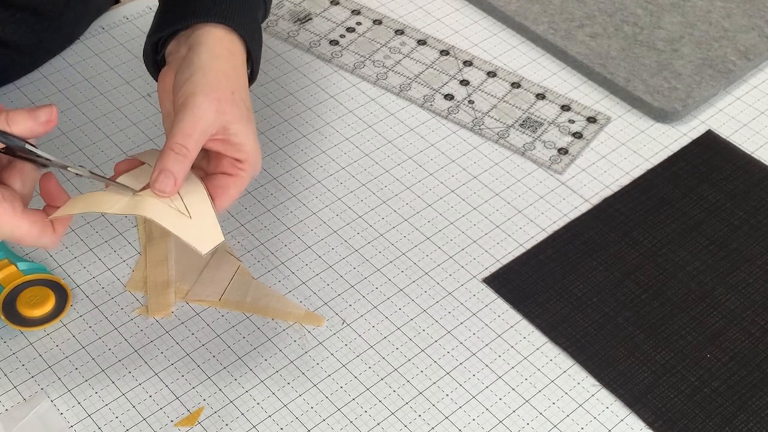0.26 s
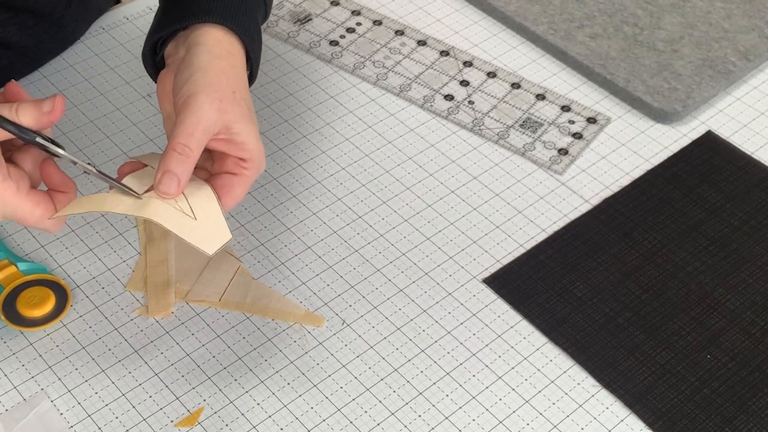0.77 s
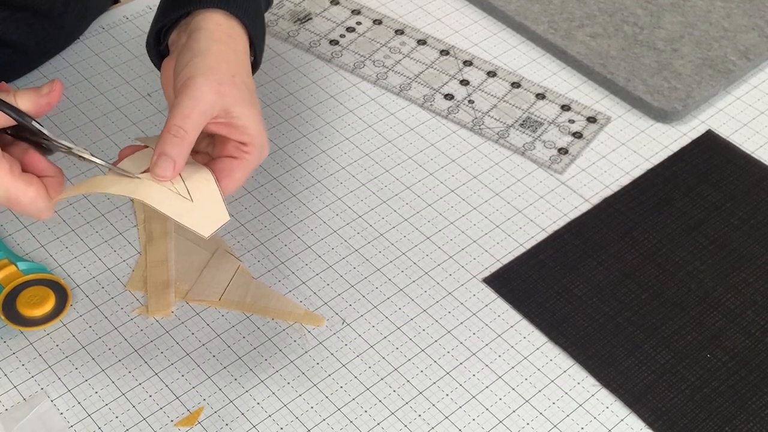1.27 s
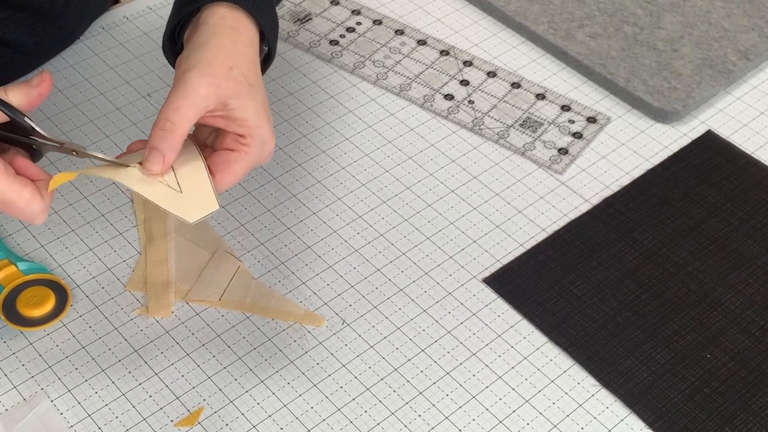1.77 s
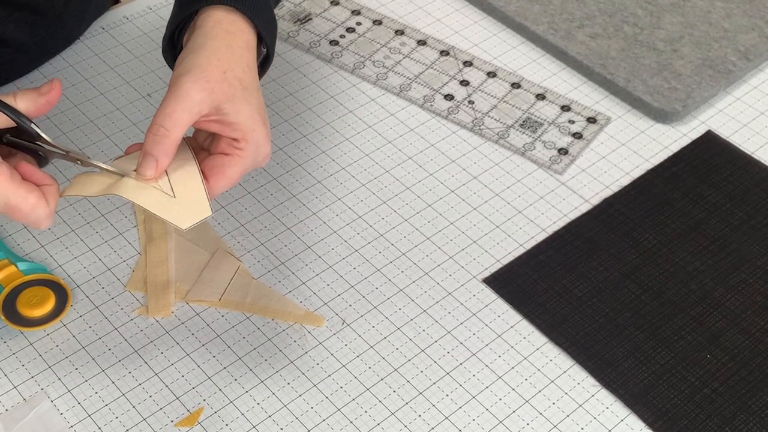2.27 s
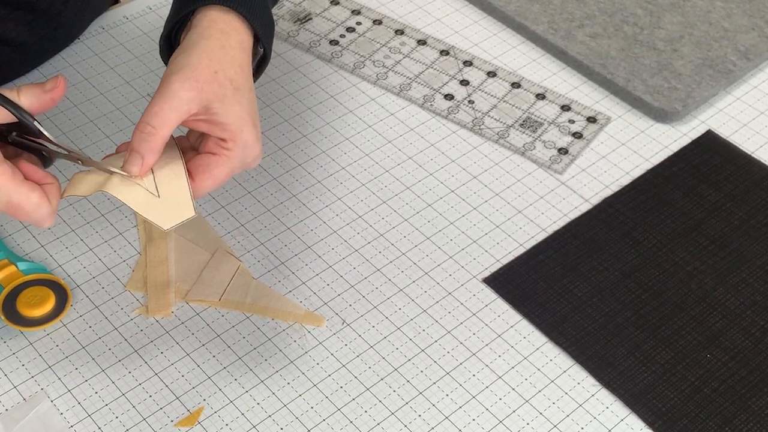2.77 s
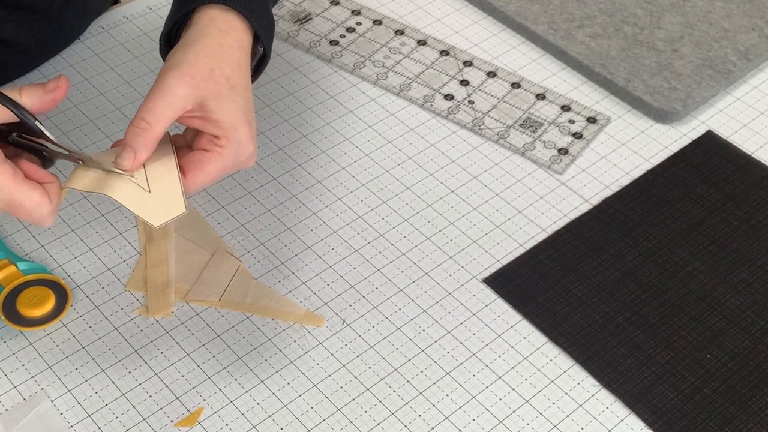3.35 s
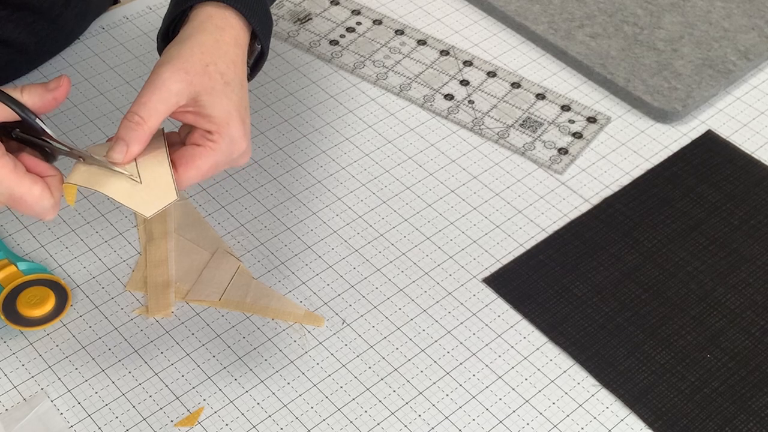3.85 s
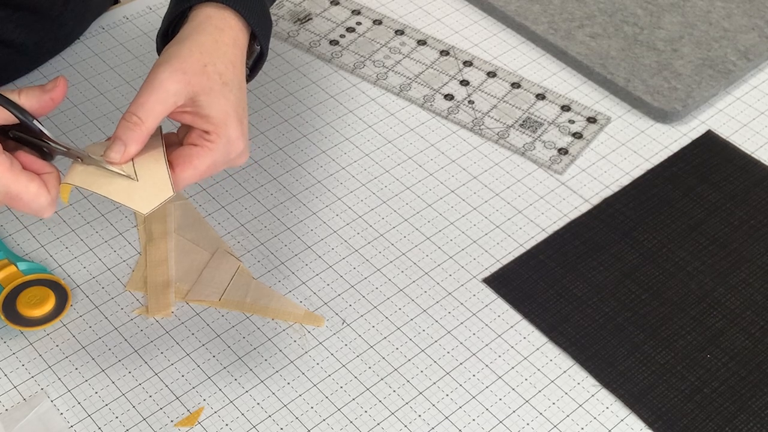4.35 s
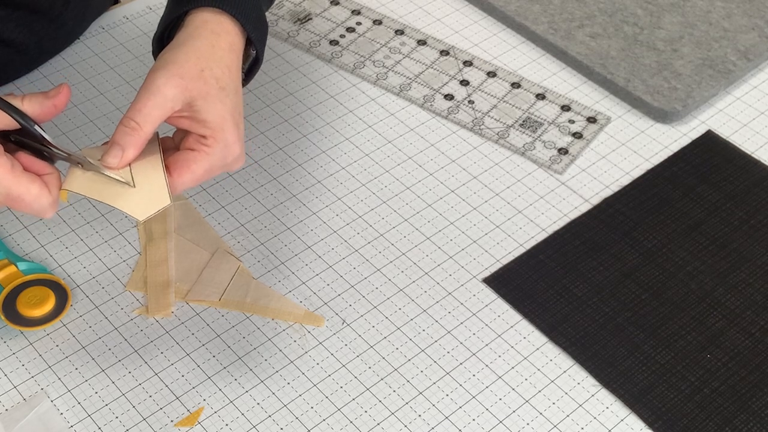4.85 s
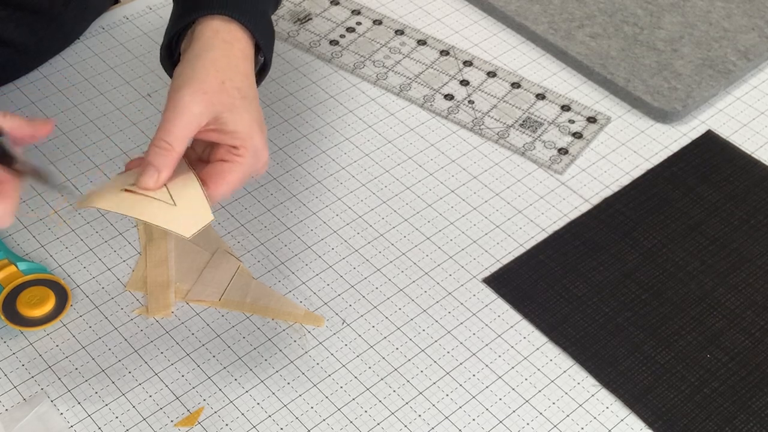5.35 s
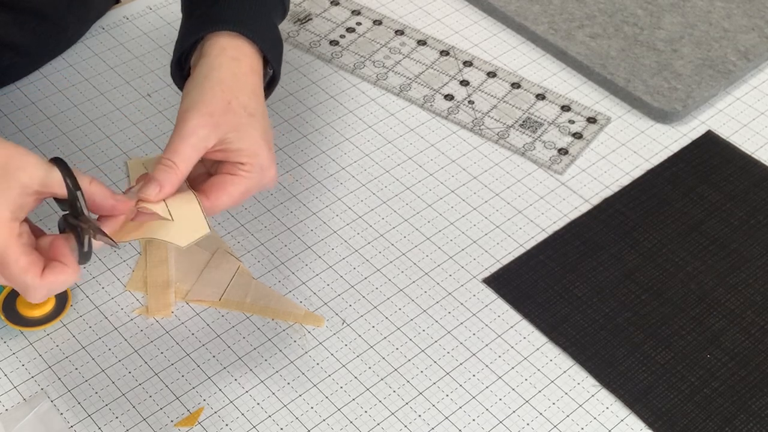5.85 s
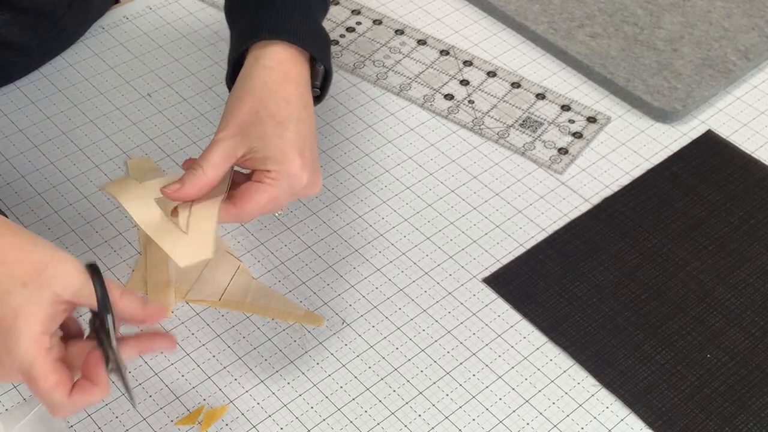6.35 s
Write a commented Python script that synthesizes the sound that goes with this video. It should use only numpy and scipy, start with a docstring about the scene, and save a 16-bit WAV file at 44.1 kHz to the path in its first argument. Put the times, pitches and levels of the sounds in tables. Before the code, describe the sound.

In a small dry room, small sharp scissors close with a brief knock, then work through stiff backed fabric in short separate rasps, light at first, firmer and crackling later. Blades slide along the cloth between cuts. The last cut bursts into crisp snaps and a second clack, then faint rustling. A low rumble, soft even hiss and wavering distant machine hum continue. Close microphone, scissors centred.

```python
"""Craft table in a small dry room: small sharp scissors work through backed fabric.
Random fibre breaks, filtered by cloth, blades and backing, rasp in short strokes; thread bundles snap
as brief crackle, and twice the scissors clack shut, a knock with ringing handles and blades.
Shaped noise makes a low rumble and a soft even hiss; wavering sines make the hum of distant machines."""
import sys
import numpy as np
from scipy import signal
from scipy.fft import rfft, irfft, next_fast_len
from scipy.io import wavfile
from scipy.ndimage import uniform_filter1d, map_coordinates

SR = 44100
rng = np.random.default_rng(int(sys.argv[2]) if len(sys.argv) > 2 else 0)


def generate_wav(sig):
    """Save sig (samples, or channels by samples) to the path in sys.argv[1] as 16-bit PCM at SR."""
    pcm = np.round(np.clip(np.atleast_2d(sig).T, -1, 1) * 32767).astype(np.int16)
    wavfile.write(sys.argv[1], SR, pcm)


N = 292199

# Spectrum of the stiff cloth. Each row: frequency in Hz, relative density in dB per Hz.
CLOTH_SPECTRUM = [(250, -9), (600, -13), (870, 0), (1150, -3.5), (1800, 0.5), (2300, -1), (2900, 1),
                  (3600, 1), (4400, 0), (5600, -2.5), (6300, -6), (9000, -8.5), (12500, -12.5),
                  (15500, -33)]
# Resonances of the blades. Each row: frequency in Hz, width in Hz, relative level in dB.
BLADE_MODES = [(4380, 200, 1), (5640, 230, 0.5), (6960, 510, 1), (8100, 460, 5.5), (9130, 810, -3),
               (10230, 660, -4), (11730, 440, -8), (12700, 390, -5.5)]


def amp(db):
    """Decibels to gain."""
    return 10 ** (np.asarray(db) / 20)


def unit(x):
    """Scale to rms 1."""
    return x / np.sqrt(np.mean(x ** 2) + 1e-20)


def along(points, hz):
    """Read (Hz, value) points on a log frequency axis."""
    f, v = np.transpose(points)
    return np.interp(np.log(hz + 1), np.log(f + 1), v)


def wobble(rate_hz):
    """Smooth random curve with rate_hz knots a second."""
    knots = rng.standard_normal(int(N * rate_hz / SR) + 4)
    return map_coordinates(knots, [np.arange(N) * rate_hz / SR])


def filtered(x, response):
    """Multiply the spectrum of x by a response of frequency."""
    m = next_fast_len(N + SR // 2)
    return irfft(rfft(x, m) * response(np.fft.rfftfreq(m, 1 / SR)), m)[..., :N]


def body(x, spectrum, size=2048):
    """Minimum-phase filter with this spectrum and unit pulse energy."""
    log_gain = np.log(amp(along(spectrum, np.fft.rfftfreq(size, 1 / SR))))
    cepstrum = irfft(log_gain)
    cepstrum[1:size // 2] *= 2  # fold onto positive time: causal
    cepstrum[size // 2 + 1:] = 0
    pulse = irfft(np.exp(rfft(cepstrum)))
    return signal.fftconvolve(x, pulse / np.linalg.norm(pulse))[:N]


def ring(x, modes, size=1024, soft_hz=13300):
    """Resonances damped by fingers and cloth; the soft contact dulls the very top."""
    t = np.arange(size) / SR
    pulse = np.zeros(size)
    for k, (hz, width_hz, db) in enumerate(modes):
        decay = width_hz * np.exp(-np.pi * width_hz * t)
        pulse += (-1) ** k * amp(db) * decay * np.cos(2 * np.pi * hz * t)
    pulse = signal.sosfilt(signal.butter(5, soft_hz, fs=SR, output="sos"), pulse)
    return signal.fftconvolve(x, pulse / np.linalg.norm(pulse))[:N]


def flexing(x, depth_db, size=256):
    """The cloth bends as it moves, so its spectrum shifts from moment to moment."""
    z = signal.stft(x, nperseg=size)[2]
    field = uniform_filter1d(rng.standard_normal(z.shape), size=3, axis=0)  # bins
    field = uniform_filter1d(field, size=14, axis=1)  # frames
    return signal.istft(z * unit(amp(depth_db * unit(field))), nperseg=size)[1][:N]


def fibres(rate_hz, scatter_db, smooth):
    """Fibres break at random moments and sizes, over a share of smooth friction; rms 1."""
    hits = rng.random(N) < rate_hz / SR
    breaks = hits * rng.choice([-1, 1], N) * amp(scatter_db * rng.standard_normal(N))
    return unit(unit(breaks) + smooth * rng.standard_normal(N))


def rasp(cloth, steel, scrape, catch_db, smooth, catch_rate_hz=130):
    """Fibres catch and break under three envelopes, sounding cloth, blades and backing."""
    # Backing along the flat of a blade. Each row: frequency in Hz, width in Hz, relative level in dB.
    backing_modes = [(886, 110, 3), (2800, 550, -2.5), (4930, 180, 4), (5520, 190, 3)]
    catches = unit(amp(catch_db * wobble(catch_rate_hz)))

    def weave():
        return catches * fibres(rate_hz=2000, scatter_db=0.5, smooth=smooth)

    cloth_sound = flexing(body(cloth * weave(), CLOTH_SPECTRUM), depth_db=2)
    steel_sound = ring(steel * weave(), BLADE_MODES)
    return cloth_sound + steel_sound + ring(scrape * weave(), backing_modes)


def squeeze(start_s, hardest_s, end_s):
    """Cut envelope: pressure builds to the middle of the sorted times, then lets go."""
    return np.interp(np.arange(N) / SR, np.sort([start_s, hardest_s, end_s]), [0, 1, 0])


def cuts(scrape_db=-8):
    """The closing edges squeeze through the cloth and catch unevenly on its threads."""
    # Blades squeezing through the cloth. Each row: start, hardest squeeze and end in seconds
    # (the last two may swap), level in dB, blade level relative to it in dB.
    cut_rows = [(0.82, 0.875, 0.92, -58.5, -7), (1.278, 1.318, 1.31, -58, 0.5),
                (1.986, 2.025, 2.04, -59, 5.5), (2.62, 2.631, 2.806, -51.5, -1.5),
                (3.201, 3.267, 3.392, -51.5, 1), (3.61, 3.735, 3.79, -56, -2),
                (4.548, 4.744, 4.7, -60.5, 4)]
    cloth, steel = np.zeros((2, N))
    for start_s, hardest_s, end_s, db, steel_db in cut_rows:
        pressure = amp(db) * squeeze(start_s, hardest_s, end_s)
        cloth += pressure
        steel += amp(steel_db) * pressure
    return rasp(cloth, steel, amp(scrape_db) * cloth, catch_db=2.5, smooth=0.36)


def burst(s, length_s, rise_s):
    """Short contact envelope: exponential rise against a Gaussian release."""
    age = np.arange(SR // 16) / SR
    shape = (1 - np.exp(-age / rise_s)) * np.exp(-(age / length_s) ** 2)
    return np.pad(shape, (round(s * SR), N))[:N]


def snaps(cloth_db=6, steel_db=-4, fizz_db=-11.0):
    """A thread bundle parts in milliseconds of crackle that fizzes and shakes cloth and blades."""
    # Thickest bundles parting. Each row: start in seconds, drive level in dB before the envelope,
    # cloth drive relative to it in dB before cloth_db, length in seconds.
    snap_rows = [(0.826, -37.5, -10, 0.0069), (0.87, -42, -6, 0.011), (2.007, -33.5, -19, 0.0034),
                 (2.029, -36, -19, 0.0054), (2.075, -33.5, -22, 0.0075), (2.213, -53, 4, .008),
                 (2.634, -36, -5.5, 0.0063), (2.646, -38, -11, .005), (2.71, -36, -16, .006),
                 (3.303, -36, -16, 0.0065), (3.692, -42, -4.5, 0.0076), (3.718, -41.5, -5, 0.0096),
                 (3.744, -35, -10.5, 0.0071), (3.778, -38.5, -13, 0.0078), (3.822, -33.5, -12, .006),
                 (3.843, -41, -15, 0.0087), (4.451, -31.5, -13.5, .011), (4.48, -38.5, -11, 0.0086),
                 (4.596, -37, -18, 0.0087), (4.63, -32, -14, 0.0057), (4.684, -33, -17, 0.011),
                 (4.7266, -30, -16, 0.0055), (4.748, -27, -9.5, 0.0065)]
    # Fizz of the parting threads. Each row: frequency in Hz, relative density in dB per Hz.
    fizz_spectrum = [(2000, -16), (6500, -12), (9000, 4.5), (12500, -3.5), (15500, -11)]
    cloth, threads = np.zeros((2, N))
    for s, db, share_db, length_s in snap_rows:
        tear = amp(db) * burst(s, length_s, rise_s=length_s)
        cloth += amp(share_db + cloth_db) * tear
        threads += tear

    def crackle():
        return fibres(rate_hz=4000, scatter_db=3.5, smooth=0.75)

    cloth_sound = body(crackle() * cloth, CLOTH_SPECTRUM)
    steel_sound = amp(steel_db) * ring(crackle() * threads, BLADE_MODES)
    return cloth_sound + steel_sound + amp(fizz_db) * body(crackle() * threads, fizz_spectrum)


def crack(s, length_s, size=2048):
    """Hard contact: brief chatter with nearly equal energy at every frequency."""
    shape = burst(0, length_s, rise_s=0.00022)[:size]
    phase = np.angle(rfft(shape * rng.standard_normal(size)))
    even = irfft(np.exp(1j * phase)) * np.sqrt(shape)
    even *= np.linalg.norm(shape) / np.linalg.norm(even)
    return np.pad(even, (round(s * SR), N))[:N]


def clacks():
    """The scissors close fully: the handles meet, ring briefly and jar the blades."""
    # Full closings. Each row: start in seconds, drive levels of knock, handles and blades in dB,
    # length in seconds.
    clack_rows = [(0.322, -36, -45, -52, 0.0069), (4.7550, -35, -39, -45, 0.0043)]
    # Knock of the handles meeting. Each row: frequency in Hz, relative density in dB per Hz.
    knock_spectrum = [(150, -12), (350, 2), (560, -1.5), (1000, 4), (1500, 7), (2300, 1), (3400, 5),
                      (4500, 3), (5400, 0.5), (6300, -5), (8000, -5.5), (11000, -15), (15500, -31)]
    # Handle resonances. Each row: frequency in Hz, width in Hz, relative level in dB.
    handle_modes = [(523, 37, 2.5), (835, 350, -3), (1493, 115, 5), (2540, 110, -5), (3700, 290, -3.5),
                    (5630, 350, -9.5)]
    knock, handles, steel = np.zeros((3, N))
    for s, knock_db, handle_db, steel_db, length_s in clack_rows:
        knock += amp(knock_db) * crack(s, length_s)
        handles += amp(handle_db) * crack(s, length_s)
        steel += amp(steel_db) * crack(s, length_s)
    return body(knock, knock_spectrum) + ring(handles, handle_modes) + ring(steel, BLADE_MODES)


def glide(start_s, end_s, edge_s=0.027):
    """Sliding contact envelope: power rises, holds and falls linearly."""
    t = np.arange(N) / SR
    return np.sqrt(np.clip(np.minimum(t - start_s, end_s - t) / edge_s, 0, 1))


def slides(steel_db=-5):
    """The open blades slide along the cloth, its backing scraping evenly on the flat of a blade."""
    # Slides. Each row: start and end in seconds, level in dB, scrape relative to it in dB.
    slide_rows = [(1.452, 1.486, -59.5, -1), (2.064, 2.09, -61.5, 11), (2.227, 2.33, -56, 0),
                  (2.355, 2.457, -61, 1), (2.889, 2.998, -54.5, -11), (3.02, 3.137, -56.5, -6),
                  (3.429, 3.534, -56.5, -1), (4.208, 4.261, -49.5, -3.5), (4.739, 4.768, -51, 7),
                  (4.848, 5, -60, -13)]
    cloth, scrape = np.zeros((2, N))
    for start_s, end_s, db, scrape_db in slide_rows:
        contact = amp(db) * glide(start_s, end_s)
        cloth += contact
        scrape += amp(scrape_db) * contact
    return rasp(cloth, amp(steel_db) * cloth, scrape, catch_db=1.6, smooth=0.47)


def rubs(steel_db=-8.5):
    """The cloth shifts in the fingers with a faint rustle and brushes the blades."""
    # Rubs. Each row: start and end in seconds, level in dB.
    rub_rows = [(1.56, 1.706, -67.5), (1.705, 1.789, -57), (2.45, 2.584, -64.5), (5.223, 5.345, -60.5),
                (5.568, 5.62, -60.5), (5.858, 5.99, -62), (6.283, 6.5, -63)]
    cloth = sum(amp(db) * glide(start_s, end_s) for start_s, end_s, db in rub_rows)
    return rasp(cloth, amp(steel_db) * cloth, 0, catch_db=2.5, smooth=0.72)


def room(x, wet_db, delay_s=0.0034, width_db=-12, count=4):
    """Direct sound plus a short tail; successive instants scatter along different paths."""
    # Decay of the room. Each row: frequency in Hz, t60 in seconds.
    decay_times = [(300, 0.32), (1500, 0.18), (5000, 0.16), (12000, 0.18)]
    hz, t, z = signal.stft(rng.standard_normal((count, 2, SR // 4)), SR, nperseg=256)
    decay = amp(-60 * t / along(decay_times, hz)[:, None])
    mid, side = signal.istft(z * decay, SR, nperseg=256)[1].swapaxes(0, 1)
    build_up = np.clip(np.arange(mid.shape[1]) / SR / delay_s - 1, 0, 1)
    side = amp(width_db) * side
    tails = np.array([mid + side, mid - side]) * build_up
    tails /= np.linalg.norm(tails, axis=2, keepdims=True)
    # overlapping half-cosine windows deal x out to the paths in turn
    turn = np.arange(N) / SR / (2 * delay_s) + np.arange(count)[:, None] / count
    paths = x * np.maximum(np.cos(2 * np.pi * turn), 0)
    return x + amp(wet_db) * signal.oaconvolve(paths[None], tails, axes=2).sum(1)[:, :N]


def hum(waver_db=2.6, waver_rate_hz=3.03, drift_hz=0.677, drift_rate_hz=4):
    """Far machines hum unsteadily; one motor speeds up, its lines rising together and trading strength."""
    # Motor lines. Each row: multiple of the cycle rate, mean level in dB when slow, in dB when fast.
    motor_lines = [(5, -48, -55), (6, -53, -48), (10, -60, -77), (12, -67, -64), (20, -70, -66.5)]
    # Lines of other machines. Each row: mean frequency in Hz, mean level in dB.
    steady_lines = [(193.5, -66)]
    slow_hz, fast_hz = 8.5, 10.05  # cycle rate before and after
    change_s, ramp_s = 4.2, 0.303  # middle and time scale of the change
    speed = (1 + np.tanh((np.arange(N) / SR - change_s) / (2 * ramp_s))) / 2
    cycle_hz = slow_hz + (fast_hz - slow_hz) * speed
    lines = [(round(order) * cycle_hz, slow_db + (fast_db - slow_db) * speed)
             for order, slow_db, fast_db in motor_lines]
    out = np.zeros(N)
    for hz, db in [*lines, *steady_lines]:
        phase = 2 * np.pi * np.cumsum(hz + drift_hz * wobble(drift_rate_hz)) / SR
        out += amp(db + waver_db * wobble(waver_rate_hz)) * unit(np.sin(phase))
    return out


def background(hiss_db=-55, rumble_db=-44.0, swell_db=0.4, swell_rate_hz=2.37):
    """Noise: gently swelling rumble alike in both ears, and hiss that widens towards the treble."""
    # Noise spectra. Each row: frequency in Hz, relative level in dB.
    rumble_spectrum = [(10, 1), (20, 1.5), (33, 1.5), (54, -10.5), (75, -8), (100, -11), (150, -14.5),
                       (200, -17.5), (245, -23.5), (300, -29.5), (400, -28.5), (900, -59)]
    hiss_spectrum = [(150, -17), (250, -3), (392, -9), (451, -7.5), (545, -8), (594, -9), (683, -9.5),
                     (949, -8), (1300, -13), (1740, -14), (2260, -15.5), (2730, -16.5), (4210, -17),
                     (13900, -18.5), (15700, -20.5)]
    # Left-right likeness of the hiss. Each row: frequency in Hz, correlation from 0 to 1.
    likeness = [(60, 1.0), (130, 0.98), (290, 0.96), (640, 0.93), (1410, 0.89), (3100, 0.82), (6820, 0.54),
                (15000, 0.43)]

    def mid_side_gain(hz):
        angle = np.arccos(np.clip(along(likeness, hz), -1, 1)) / 2
        return amp(along(hiss_spectrum, hz)) * np.array([np.cos(angle), np.sin(angle)])

    mid, side = filtered(rng.standard_normal((2, N)), mid_side_gain)
    hiss = unit(np.array([mid + side, mid - side]))
    rumble = filtered(rng.standard_normal(N), lambda hz: amp(along(rumble_spectrum, hz)))
    swelling = unit(rumble * amp(swell_db * wobble(swell_rate_hz)))
    return amp(hiss_db) * hiss + amp(rumble_db) * swelling


def scene():
    """Scissors in the middle, over the background of the room."""
    cutting = room(cuts() + slides() + rubs() + snaps(), wet_db=-11.5)
    closing = room(clacks(), wet_db=-3.0)
    return cutting + closing + hum() + background()


def record(dry, top_hz=15830):
    """Band limit: nothing passes from top_hz up."""
    return filtered(dry, lambda hz: hz < top_hz)


dry = scene()
out = record(dry)
generate_wav(out)
```